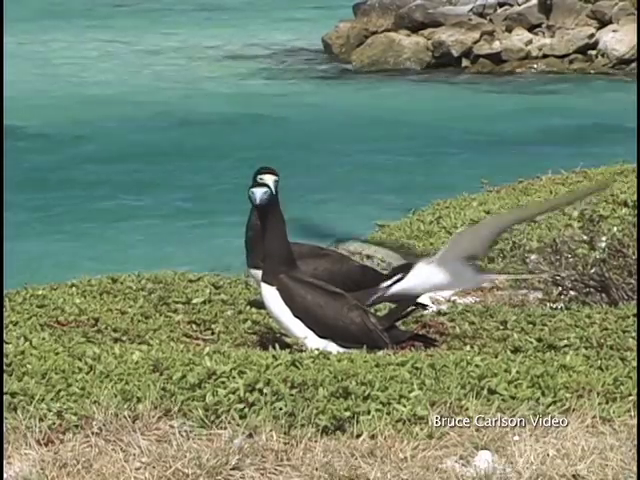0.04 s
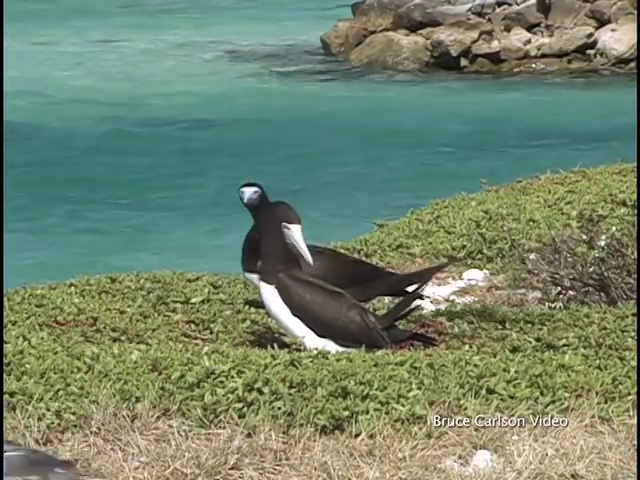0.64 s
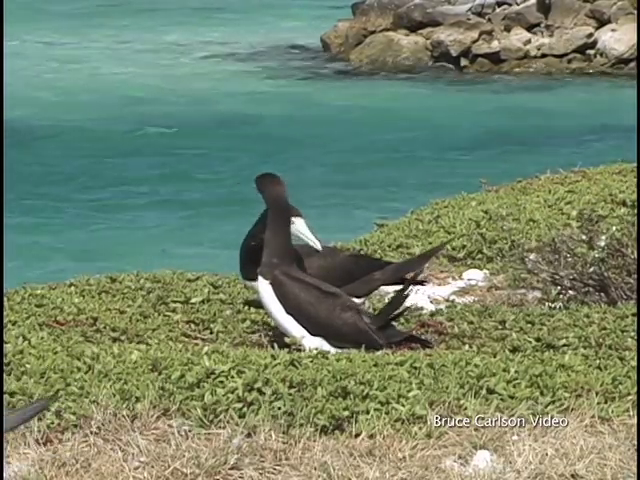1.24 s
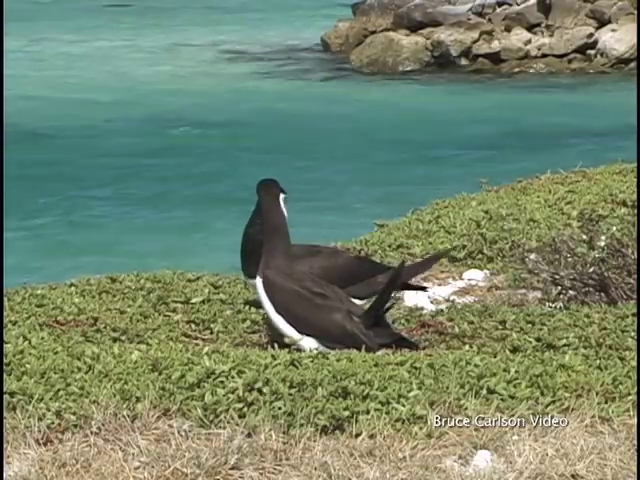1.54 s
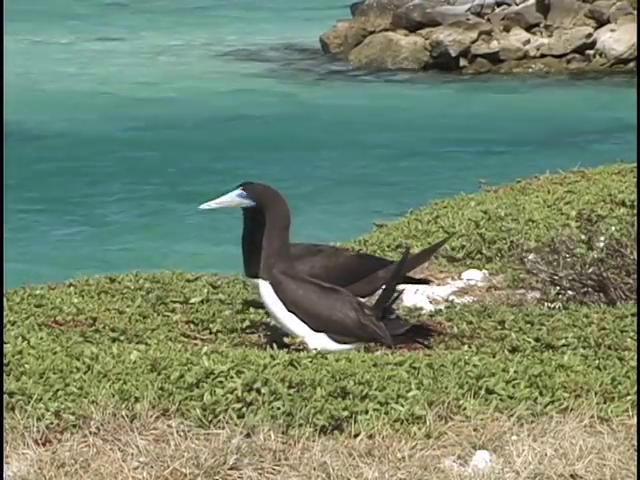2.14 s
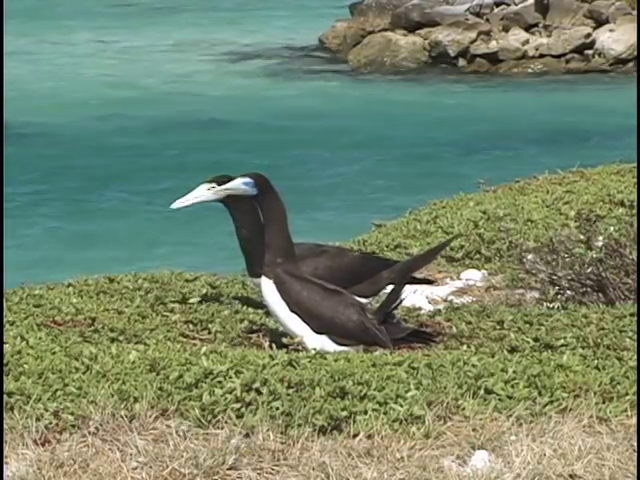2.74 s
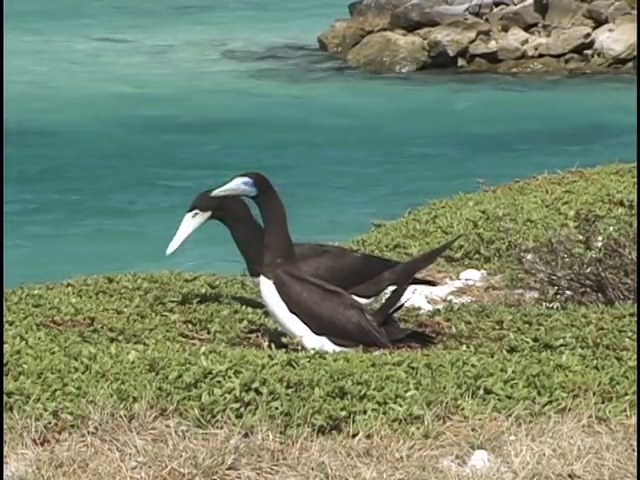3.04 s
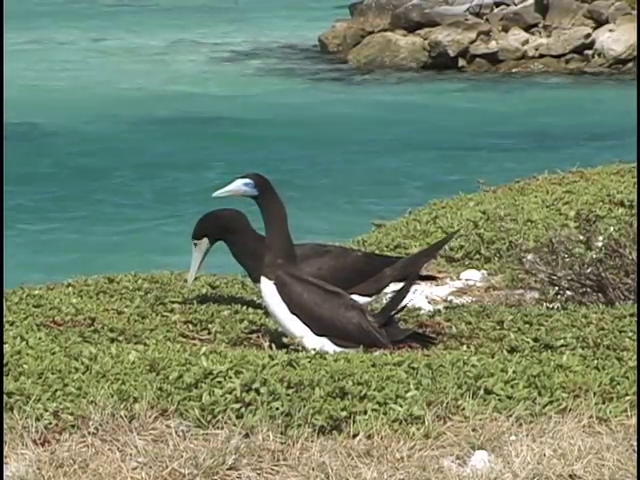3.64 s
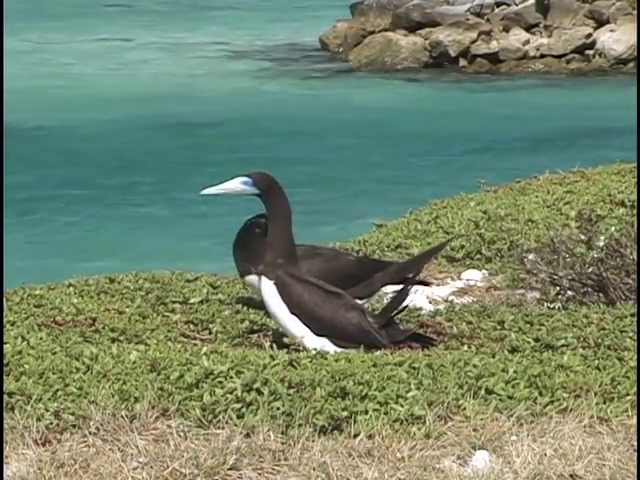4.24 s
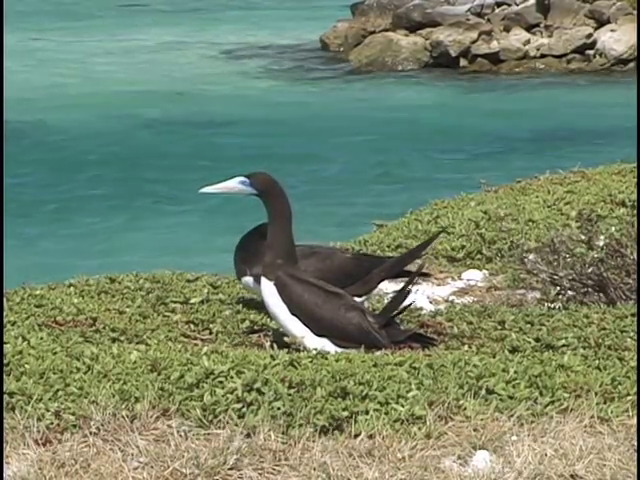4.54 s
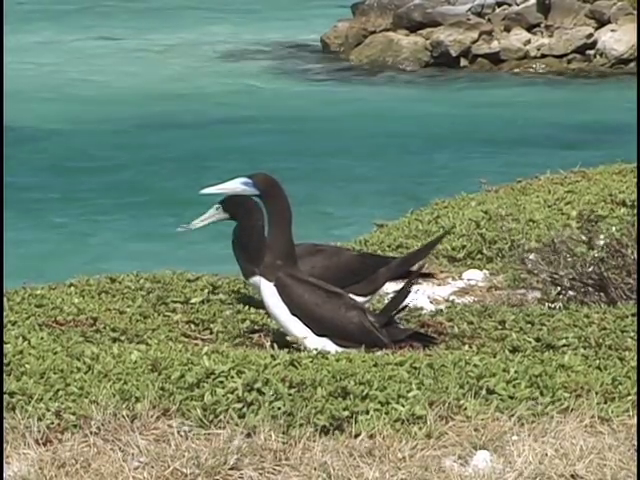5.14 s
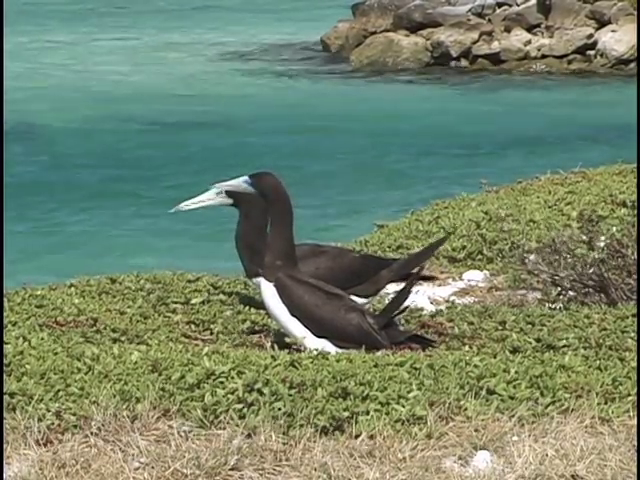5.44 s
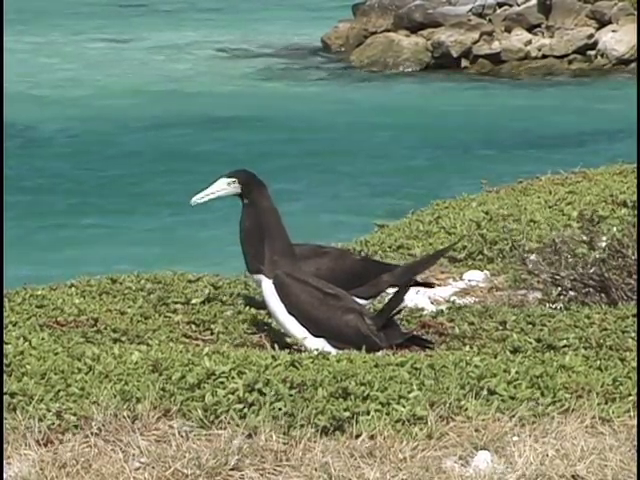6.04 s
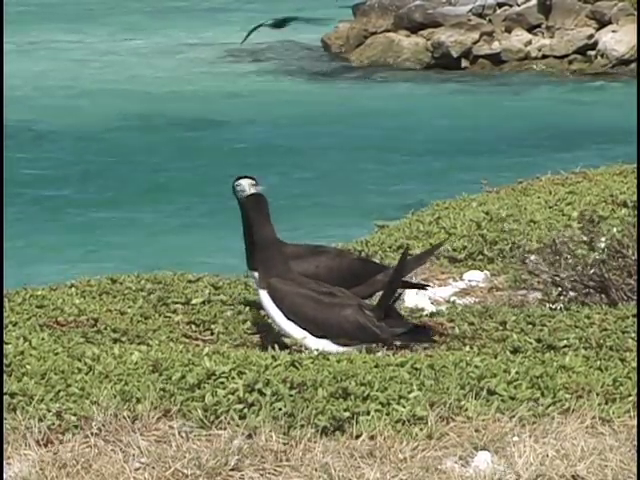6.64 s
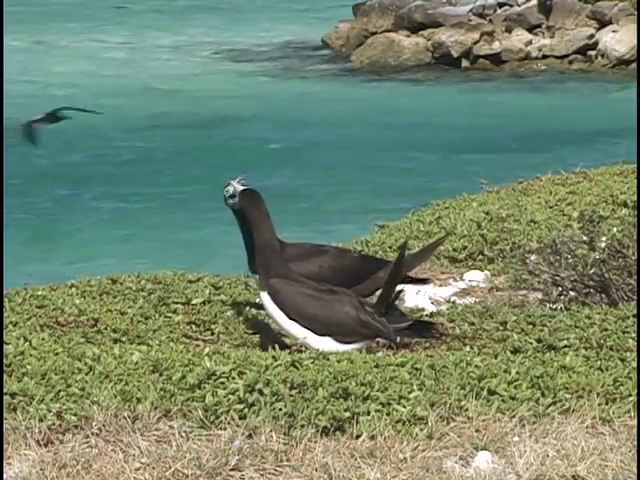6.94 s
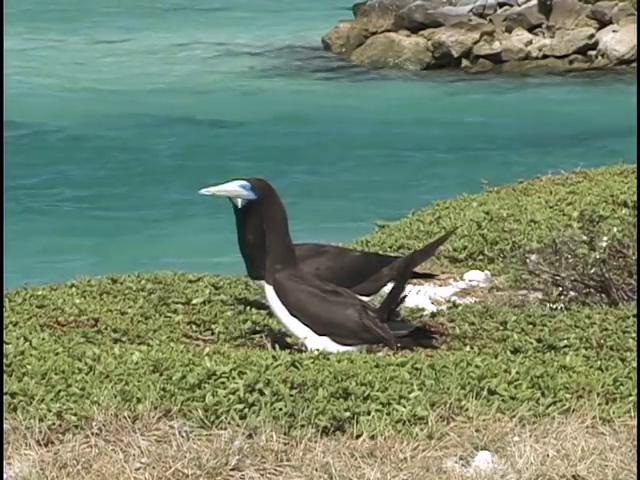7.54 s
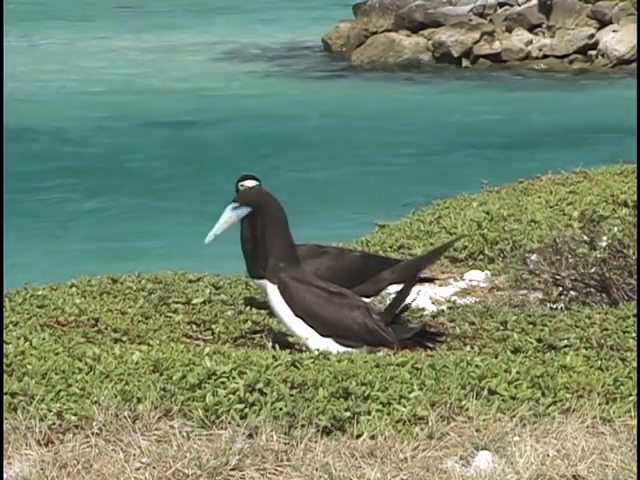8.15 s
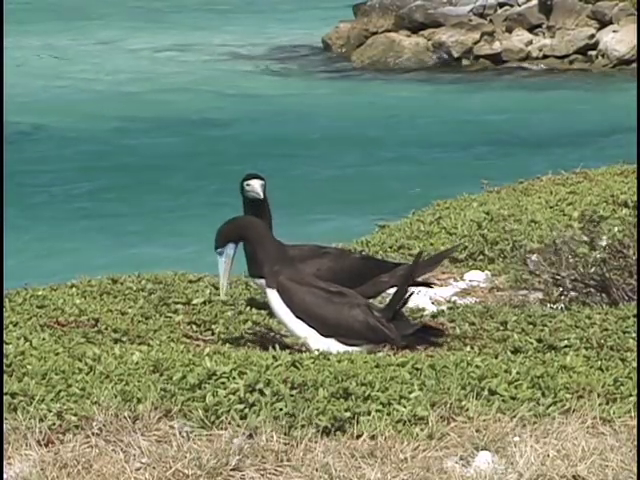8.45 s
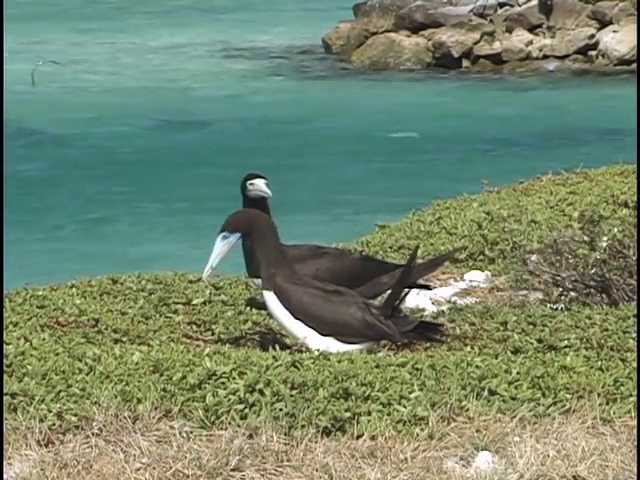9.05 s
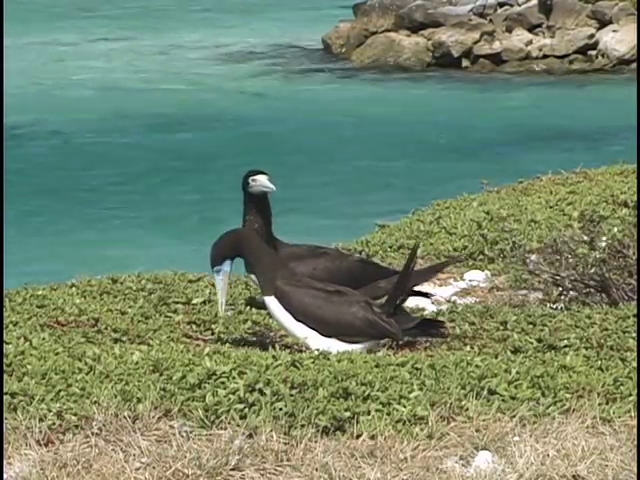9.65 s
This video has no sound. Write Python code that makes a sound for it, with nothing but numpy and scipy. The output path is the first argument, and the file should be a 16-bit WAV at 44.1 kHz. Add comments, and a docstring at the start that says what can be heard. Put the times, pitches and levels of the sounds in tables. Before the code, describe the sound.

Low wind rumble and a soft sea wash, with seabirds yelping and rasping nearby and a faint colony beyond.

```python
"""A grassy shore in a breeze, with terns overhead. Near birds give nasal, arching calls and slurred cries,
others yelp further off, one holds a long quavering note, and there are short dry rasps and croaks.
The calls are harmonics of the syrinx shaped by the throat; rasps are rattled turbulence, croaks slow pulses.
Wind eddies buffet the microphone in gusts and lulls, easing later on, over grass, sea and a far colony."""
import sys
import numpy as np
from scipy import signal
from scipy.fft import rfft, irfft, next_fast_len
from scipy.io import wavfile
from scipy.ndimage import uniform_filter1d

SR = 44100
rng = np.random.default_rng(int(sys.argv[2]) if len(sys.argv) > 2 else 0)


def generate_wav(signal):
    """Clip the signal to [-1, 1] and save it as 16-bit WAV at the path in sys.argv[1]."""
    frames = np.transpose(np.atleast_2d(signal))
    scaled = np.clip(frames, -1, 1) * 32767
    pcm = np.round(scaled).astype(np.int16)
    wavfile.write(sys.argv[1], SR, pcm)


N = 436149
TIME = np.arange(N) / SR
CUTOFF_HZ = 15000


def from_db(db):
    return 10 ** (np.asarray(db) / 20)


def rms_one(x):
    return x / np.sqrt(np.mean(x ** 2) + 1e-20)


def span(start_s, end_s):
    """Sample numbers between two times, at least 10 ms apart."""
    return np.arange(max(int(start_s * SR), 0), min(int(max(end_s, start_s + .01) * SR), N))


def in_time(rows, t=TIME):
    """The columns of a curve at times t."""
    times_s, *columns = np.transpose(rows)
    return [np.interp(t, times_s, column) for column in columns]


def at_hz(spectrum, hz):
    """Gain in dB, read on a log-frequency axis."""
    points_hz, db = np.transpose(spectrum)
    return np.interp(np.log(hz + 1), np.log(points_hz), db)


def drift(rate_hz, count=N):
    """Random wander with a spread of about 1."""
    steps = np.arange(count) * rate_hz / SR
    return 1.22 * np.interp(steps, np.arange(2048), rng.standard_normal(2048))


def shaped(x, gain_at):
    """Filter x by a gain given as a function of frequency."""
    size = next_fast_len(len(x))
    return irfft(rfft(x, size) * gain_at(np.fft.rfftfreq(size, 1 / SR)), size)[:len(x)]


def noise(spectrum):
    """Coloured noise, rms 1."""
    return rms_one(shaped(rng.standard_normal(N), lambda hz: from_db(at_hz(spectrum, hz))))


def voice(pitch_hz, level_db, throat, rasp_rad, flutter_db, harmonics=24, favoured_db={}, jitter=.0015):
    """Syrinx harmonics slide through the throat resonances; each flutters, and rasp frays it into noise."""
    n = len(pitch_hz)
    pitch_hz = pitch_hz * (1 + jitter * drift(250, n))
    phase = 2 * np.pi * np.cumsum(pitch_hz) / SR
    out = np.zeros(n)
    for k in range(1, harmonics + 1):
        hz = k * pitch_hz
        fray_rad = rasp_rad * np.minimum(hz / 4000, 1.5) * drift(700, n)
        gain_db = throat(hz) + favoured_db.get(k, 0) + flutter_db * drift(39.5, n)
        out += (hz < CUTOFF_HZ) * from_db(gain_db) * np.sin(k * phase + fray_rad)
    edge_s = np.minimum(np.arange(n), np.arange(n)[::-1]) / SR
    return np.sqrt(2) * out * from_db(level_db) * np.minimum(edge_s / .007, 1)


SLACK_HZ, TAUT_HZ = 600, 900


def hoarseness(pitch_hz, slack_rad=.55, taut_rad=.06):
    """Phase scatter: the slacker the syrinx, the more it rasps."""
    return np.interp(pitch_hz, [SLACK_HZ, TAUT_HZ], [slack_rad, taut_rad])


def arch(t, length_s, lean, dome, swoop_s=.014, drop_s=.052):
    """Pitch as a share of its top: a quick swoop up, a leaning, domed hold, and a drop."""
    along = t / length_s - .5
    swoop = 1 - .25 * np.minimum(np.exp(-t / swoop_s), 1.4)
    hold = 1 + lean * along - dome * (2 * along) ** 2
    drop = 1 - .28 * np.clip(1 - (length_s - t) / drop_s, 0, 1.15) ** 2
    shape = swoop * hold * drop
    return shape / shape.max()


# Near calls. Each row: start and end in seconds, top pitch in Hz, lean (share the pitch climbs),
# dome (share the ends sag), level in dB, swell over the note in dB, colour in dB at 1.8, 4.8, 8, 11 kHz.
NEAR_NOTES = [(0.356, 0.517, 943, 0.048, 0.0096, -41, -9.5, -0.5, -6, -8.5, -7),
              (1.626, 1.782, 934.7, 0.036, 0.039, -47, -10.5, 6, 5, 4, 0),
              (2.371, 2.521, 952, 0.054, 0.027, -41, -6.5, 2, -1.5, -2, -6),
              (3.204, 3.36, 1003, -0.033, 0.081, -39.5, -1, -1, -1.5, 2.5, -2.5),
              (3.584, 3.639, 660, 0.032, 0.002, -49, -3.5, 8.5, 6, -1, 3),
              (3.61, 3.755, 986, -0.02, 0.0081, -36.5, -5, -13, -22, -14, -11),
              (3.635, 3.774, 844, 0.12, 0.075, -41, 2.5, 5, 0.5, -6.5, 0.5),
              (3.894, 4.001, 794, 0.068, 0.054, -42, 1, 3, 0.5, -12, 0),
              (4.029, 4.094, 726, 0.066, 0.018, -48.5, -2, 2, -0.5, -9, -2),
              (4.148, 4.316, 1027, 0.045, 0.23, -39.5, -1.5, 3, -6.5, -7, 1.5),
              (4.363, 4.417, 769, -0.11, 0.0, -50.5, 3, 8.5, -8, -7, -10),
              (4.429, 4.546, 924, -0.035, 0.077, -46, 6, 12, -2.5, -7, -5),
              (7.595, 7.731, 774, -0.15, 0.074, -48, 6, 11, -2.5, -9, 5)]
# Colour bands in Hz; the second stays at 0 dB.
COLOUR_BANDS_HZ = [1800, 2800, 4800, 8000, 11000]
# A calling tern's throat. Each row: frequency in Hz, gain in dB.
CALL_THROAT = [(800, -21), (1400, -14), (1900, -13), (2300, 3), (2850, -0.5), (3400, -5), (4900, -7.5),
               (5600, -8.5), (6300, -24), (7800, -10), (9400, -23.5), (10400, -22.5), (12200, -32),
               (14500, -44)]
# Harmonics of a taut syrinx. Each entry: harmonic number, gain in dB.
TAUT_HARMONICS_DB = {5: 3, 6: -2, 8: 6}


def near_calls(effort_db_per_octave=18, dull_onset_db=-8, onset_s=.012, harsh_db=3):
    """Nasal, arching calls. Effort raises pitch and level together; a slack syrinx turns hoarse."""
    out = np.zeros(N)
    for start_s, end_s, top_hz, lean, dome, level_db, swell_db, low_db, *treble_db in NEAR_NOTES:
        at = span(start_s - .012, end_s + .013)   # the voice starts early and runs on
        t, length_s = TIME[at] - start_s, end_s - start_s
        pitch_hz = top_hz * arch(t, length_s, lean, dome)
        effort_db = effort_db_per_octave * np.log2(pitch_hz / top_hz) + swell_db * (t / length_s - .5)
        colour = list(zip(COLOUR_BANDS_HZ, [low_db, 0, *treble_db]))
        # upper harmonics take a few cycles to build, and stand out as the pitch drops
        onset = np.exp(-np.arange(len(at)) / (onset_s * SR))
        bright_db = dull_onset_db * onset + harsh_db * (1 - pitch_hz / top_hz)

        def throat(hz):
            return at_hz(CALL_THROAT, hz) + at_hz(colour, hz) + bright_db * np.minimum(hz / 4000, 2)

        out[at] += voice(pitch_hz, level_db + effort_db, throat, hoarseness(pitch_hz), flutter_db=3.5,
                         favoured_db=TAUT_HARMONICS_DB if top_hz > TAUT_HZ else {})
    return out


# Slurred cries, thin creaks that close two calls, one far wail, distant falling peeps.
# Each row: level at the top pitch in dB, contour of (time in seconds, pitch in Hz).
SLURRED_CRIES = [(-42, [(0.25, 733), (0.305, 950), (0.345, 955), (0.375, 730)]), (-45.5, [(0.508, 707),
                 (0.533, 900), (0.562, 937), (0.612, 617)]), (-50, [(1.483, 720), (1.508, 952),
                 (1.568, 950), (1.612, 737)]), (-50, [(2.115, 650), (2.168, 930), (2.192, 738),
                 (2.212, 820), (2.258, 744), (2.282, 579)]), (-52, [(2.66, 657), (2.75, 972), (2.798, 990),
                 (2.868, 632), (2.942, 687), (2.99, 1000), (3.055, 680)]), (-47, [(3.283, 706),
                 (3.325, 913), (3.358, 926), (3.402, 727), (3.442, 973), (3.512, 940), (3.575, 730)]),
                 (-47.5, [(3.76, 883), (3.79, 892), (3.825, 760), (3.875, 878), (3.915, 796), (3.985, 928),
                 (4.025, 770)]), (-43.5, [(5.39, 673), (5.443, 941), (5.482, 930), (5.518, 713)]),
                 (-40, [(5.505, 703), (5.542, 953), (5.567, 993), (5.594, 944), (5.625, 984), (5.652, 944),
                 (5.705, 595)]), (-42, [(5.737, 637), (5.772, 938.3), (5.818, 965), (5.865, 881),
                 (5.928, 908), (5.988, 572.3)])]
CLOSING_CREAKS = [(-53.5, [(0.49, 853), (0.555, 623)]), (-60.5, [(2.505, 768), (2.567, 593)])]
FAR_WAIL = [(-56.5, [(7.94, 623), (7.99, 837), (8.28, 861), (8.41, 811), (8.505, 642)])]
FAR_PEEPS = [(-60.5, [(4.612, 2110), (4.645, 2230), (4.68, 2030)]), (-61, [(4.738, 2170), (4.77, 2240),
             (4.845, 1960)])]
# Throats for cry, creak and wail. Each row: frequency in Hz, gain in dB.
CRYING_THROAT = [(1000, -21), (1900, -12.5), (2300, 2), (2900, -1), (3800, -9), (4800, -17), (5750, -12.5),
                 (6500, -34), (7700, -17), (8600, -23.5), (9500, -40), (11300, -35.5), (14000, -54)]
CREAKING_THROAT = [(1500, -11), (2400, 9), (6500, -12), (8000, -13.5), (9500, -21), (12000, -14),
                   (14500, -35)]
WAILING_THROAT = [(850, -15), (1700, -4.5), (2550, 4), (3400, -44)]


def cries(rows, throat_spectrum, effort_db_per_octave=21.5, glide_s=.0202, fade_s=.0043, harsh_db=6.5):
    """The voice slurs along a contour unbroken, louder as the pitch rises and harsher as it falls back."""
    out = np.zeros(N)
    for level_db, contour in rows:
        at = span(contour[0][0], contour[-1][0])
        t = TIME[at]
        pitch_hz = uniform_filter1d(in_time(contour, t)[0], int(glide_s * SR), mode="nearest")
        effort_db = effort_db_per_octave * np.log2(pitch_hz / pitch_hz.max())
        fallen = 1 - pitch_hz / np.maximum.accumulate(pitch_hz)
        fade = np.minimum(np.minimum(t - t[0], t[-1] - t) / fade_s, 1)
        throat = lambda hz: at_hz(throat_spectrum, hz) + harsh_db * fallen * np.minimum(hz / 4000, 2)
        out[at] += fade * voice(pitch_hz, level_db + effort_db, throat, hoarseness(pitch_hz), flutter_db=2.5)
    return out


# The long note. Each row: time in seconds, pitch in Hz, level in dB, sliding resonance in Hz.
QUAVER_CURVE = [(0.758, 559, -75, 3660), (0.798, 590, -63, 3630), (0.929, 625, -56.5, 3900),
                (1.001, 587, -59, 3520), (1.08, 621.6, -58.5, 2940), (1.222, 605.5, -60.5, 2540),
                (1.5, 571.5, -57.5, 2400), (1.92, 528, -62.5, 2420)]
# Its throat. Each row: frequency in Hz, gain in dB.
QUAVERING_THROAT = [(600, -14.5), (1200, -13.5), (1800, 1), (2300, -9), (3100, -7.5), (3700, -14),
                    (4400, -9.5), (7400, -51), (8300, -19), (9500, -41), (10600, -32), (13000, -43)]


def quaver(rate_hz=69, vibrato=.035, throb_db=3, resonance_db=10.5, width_hz=600, fade_db_per_s=20.5):
    """A low note with fast, throbbing vibrato; a throat resonance slides down as bass and top fade."""
    out, at = np.zeros(N), span(QUAVER_CURVE[0][0], QUAVER_CURVE[-1][0])
    t = TIME[at]
    pitch_hz, level_db, centre_hz = in_time(QUAVER_CURVE, t)
    shake_hz = rate_hz * (1 + .04 * drift(30, len(at)))
    shake = np.sin(2 * np.pi * np.cumsum(shake_hz) / SR)

    def throat(hz):
        outer_bands = np.interp(hz, [1200, 1800, 4400, 9000], [1, 0, 0, 1])
        peak_db = resonance_db * np.exp(-((hz - centre_hz) / width_hz) ** 2)
        return at_hz(QUAVERING_THROAT, hz) - fade_db_per_s * (t - t.mean()) * outer_bands + peak_db

    shaken_hz = pitch_hz * (1 + vibrato * shake)
    out[at] = voice(shaken_hz, level_db + throb_db * shake, throat, rasp_rad=.1, flutter_db=2)
    return out


# Dry rasps. Each row: start and length in seconds, level in dB, throat opening from 0 to 1.
DRY_RASPS = [(1.409, 0.053, -47, 0.058), (1.593, 0.084, -47, 0.086), (1.66, 0.17, -50, 0.052),
             (1.962, 0.061, -48.5, 0.026), (3.72, 0.01, -39, 0.78), (6.244, 0.061, -49.5, 0.15),
             (6.557, 0.072, -49.5, 0.13), (6.797, 0.076, -45.5, 0.048), (7.052, 0.064, -47.5, 0.043),
             (7.381, 0.0628, -47.5, 0.396), (7.978, 0.062, -53.5, 0.26), (8.311, 0.058, -53, 0.87)]
# Turbulence in a narrow and an open throat. Each row: frequency in Hz, gain in dB.
NARROW_THROAT = [(900, -75.5), (2200, 12), (2850, 17), (3450, 16.5), (4300, 4), (5300, -5), (7000, -61.5)]
OPEN_THROAT = [(900, -11), (2800, 11), (5400, 11), (7000, -4), (14000, -27)]


def rasps(rattle_hz=165, rattle_db=3):
    """Toneless clucks: turbulence chopped by a slow, uneven rattle of the syrinx."""
    out, narrow, wide = np.zeros(N), noise(NARROW_THROAT), noise(OPEN_THROAT)
    phase = 2 * np.pi * np.cumsum(rattle_hz * (1 + .15 * drift(110))) / SR
    rattle = rms_one(from_db(-rattle_db * np.sin(phase)))
    for start_s, length_s, level_db, opening in DRY_RASPS:
        at = span(start_s, start_s + length_s)
        swell = np.abs(np.sin(np.linspace(0, np.pi, len(at)))) ** .66
        breath = np.sqrt(1 - opening) * narrow[at] + np.sqrt(opening) * wide[at]
        out[at] += from_db(level_db) * swell * rattle[at] * breath
    return out


# Croaks. Each row: start and length in seconds, level in dB, chest gain in dB.
CREAKY_CROAKS = [(6.108, 0.031, -51, -29), (6.464, 0.0444, -48.5, 11)]
# Resonances. Each row: frequency in Hz, width in Hz and, for the throat only, gain in dB.
THROAT_MODES = [(3170, 260, 13), (5250, 600, -8)]
CHEST_MODES = [(1100, 90), (1750, 860)]


def croaks(pulse_hz=140):
    """Slow, separate pulses of the syrinx ring the throat and chest."""
    out = np.zeros(N)
    for start_s, length_s, level_db, chest_db in CREAKY_CROAKS:
        at = span(start_s, start_s + length_s)
        cycles = np.cumsum(pulse_hz * (1 + .132 * drift(160, len(at)))) / SR
        pulses = np.diff(np.floor(cycles), prepend=-1)
        modes = THROAT_MODES + [(hz, width_hz, chest_db) for hz, width_hz in CHEST_MODES]
        rings = sum(from_db(db) * signal.lfilter(*signal.iirpeak(hz, hz / width_hz, fs=SR), pulses)
                    for hz, width_hz, db in modes)
        rings = signal.sosfilt(signal.butter(3, 5500, fs=SR, output="sos"), rings)
        out[at] += from_db(level_db) * rms_one(rings)
    return out


# Yelps further off. Each row: start and end in seconds, top pitch in Hz, level in dB.
HOARSE_YELPS = [(0.125, 0.27, 764, -52.5), (0.18, 0.265, 936, -52.5), (2.019, 2.11, 787, -56.5),
                (3.503, 3.578, 859, -47.5), (3.824, 3.878, 759.7, -49.5), (4.07, 4.149, 819, -47)]


def yelps(rows, air_db_per_khz, harmonics, rasp_rad, droop=.2, edge_db=-7):
    """Each yelp is one arch of pitch and effort; distance dulls it above 3 kHz."""
    out = np.zeros(N)
    throat = lambda hz: at_hz(CRYING_THROAT, hz) + air_db_per_khz * np.maximum(hz / 1000 - 3, 0)
    for start_s, end_s, top_hz, level_db in rows:
        at = span(start_s, end_s)
        slack = np.abs(np.linspace(-1, 1, len(at))) ** 2.4
        out[at] += voice(top_hz * (1 - droop * slack), level_db + edge_db * slack, throat, rasp_rad,
                         flutter_db=2, harmonics=harmonics)
    return out


def colony(count=220):
    """Far terns yelp at random, little but their main resonance arriving; a few are nearer."""
    when, length, pitch, nearness = rng.random((count, 4)).T
    start_s = when * (N / SR - .1)
    end_s = start_s + .1 + .1 * length
    top_hz, level_db = 740 + 280 * pitch, -76 + 13 * nearness ** 2
    return yelps(zip(start_s, end_s, top_hz, level_db), air_db_per_khz=-8, harmonics=3, rasp_rad=0)


# Ground reflection. Each row: delay in seconds, gain in dB.
GROUND_ECHO = [(0.018, -23)]


def outdoors(x, scatter_db=-19, t60_s=.2):
    """Adds a reflection off the ground and a faint scatter from shrubs and rocks."""
    t = TIME[:SR // 2]
    response = rng.standard_normal(len(t)) * from_db(-60 * t / t60_s)
    response = signal.sosfilt(signal.butter(1, 4500, fs=SR, output="sos"), response)
    response *= from_db(scatter_db) / np.linalg.norm(response)
    for delay_s, db in GROUND_ECHO:
        response[int(delay_s * SR)] += from_db(db)
    return x + signal.fftconvolve(x, response)[:N]


# Gusts and lulls. Each row: centre and width in seconds, level change in dB.
WIND_GUSTS = [(1.199, 0.016, 4.5), (3.239, 0.029, 6), (4.893, 0.013, 6), (7.2, 0.15, 3),
              (9.143, 0.086, 8.5)]
WIND_LULLS = [(3.41, 0.044, -6), (4.1, 0.63, -2), (5.6, 0.13, -6.5), (6.98, 0.09, -6), (7.6, 0.086, -10.5)]
# Buffeting. Each row: frequency in Hz, gain in dB.
BUFFET_SPECTRUM = [(10, -56), (25, -10), (70, 1.5), (160, -4), (290, -14), (500, -25.5), (1200, -39)]


def wind(breeze_db=-34, ease_at_s=6.35, ease_s=.42, ease_db=-6.5, lump_db=3.5):
    """Eddies at the microphone; stronger gusts shed smaller eddies and so reach higher."""
    steady_db = breeze_db + ease_db * np.clip((TIME - ease_at_s) / ease_s, 0, 1)
    level_db = steady_db + sum(db * np.exp(-((TIME - centre_s) / width_s) ** 2)
                               for centre_s, width_s, db in WIND_GUSTS + WIND_LULLS)
    eddies = rms_one(shaped(noise(BUFFET_SPECTRUM), lambda hz: 1 / (1 + (hz / 1100) ** 3)))
    large = shaped(eddies, lambda hz: 1 / (1 + (hz / 130) ** 4))
    bright_db = .97 * np.minimum(level_db + 33.5, 5)
    small = (eddies - large) * from_db(bright_db + lump_db * drift(45))
    return from_db(level_db) * (large + small)


# Background. Each row: time in seconds, wash level in dB, grass level in dB.
SHORE_LEVELS = [(0, -59, -68), (5.5, -61.5, -68.5), (6.5, -58.5, -64.5), (7.7, -60, -69.5),
                (8.25, -59, -57), (8.7, -55, -69), (9.89, -59.5, -62.5)]
# Wash and grass. Each row: frequency in Hz, gain in dB.
WASH_SPECTRUM = [(200, 1), (500, 3), (1000, 2.5), (1600, -1), (2600, 4.5), (3200, -2.5), (4200, -12),
                 (7000, -17.5), (12000, -21), (15000, -28)]
GRASS_SPECTRUM = [(1500, 20.5), (6500, 11), (10000, 3.5), (15000, -60)]


def shore():
    """The even wash of sea and colony, and grass stirring in the breeze."""
    wash_db, grass_db = in_time(SHORE_LEVELS)
    wash = from_db(wash_db + .65 * drift(25)) * noise(WASH_SPECTRUM)
    grass = from_db(grass_db + 2.5 * drift(60)) * noise(GRASS_SPECTRUM)
    return wash + grass


def scene():
    """Terns with their reflections, over wind and shore, in mono."""
    birds = near_calls() + cries(SLURRED_CRIES, CRYING_THROAT) + cries(CLOSING_CREAKS, CREAKING_THROAT)
    birds += yelps(HOARSE_YELPS, air_db_per_khz=-.06, harmonics=16, rasp_rad=.67)
    birds += colony() + cries(FAR_WAIL, WAILING_THROAT) + cries(FAR_PEEPS, CALL_THROAT)
    birds += quaver() + rasps() + croaks()
    return (outdoors(birds) + wind() + shore())[None]


def record(dry):
    """A steep low-pass cuts the top."""
    return signal.sosfilt(signal.ellip(10, .1, 80, CUTOFF_HZ, fs=SR, output="sos"), dry)


dry = scene()
out = record(dry)
generate_wav(out)
```